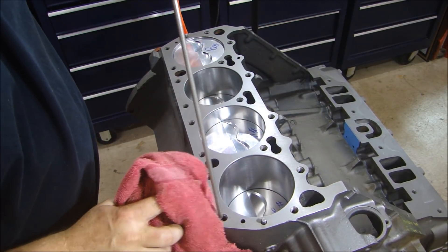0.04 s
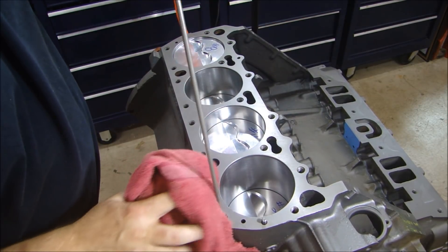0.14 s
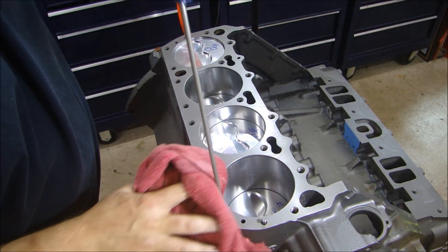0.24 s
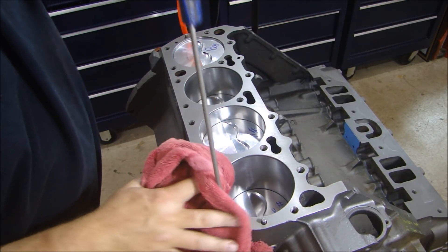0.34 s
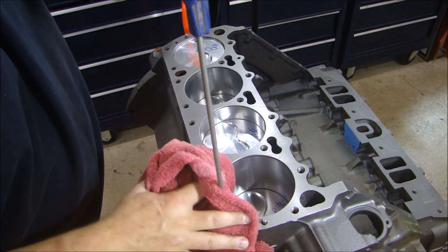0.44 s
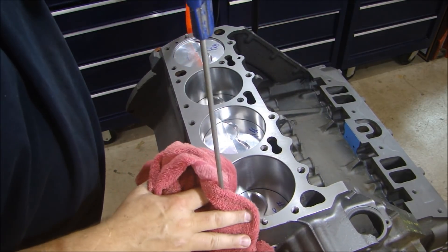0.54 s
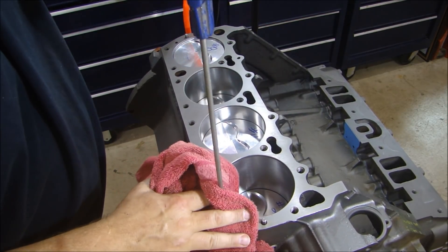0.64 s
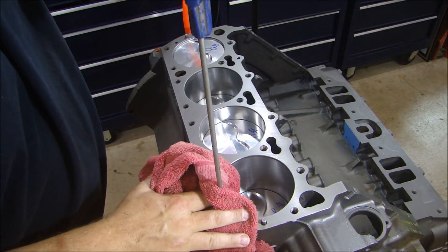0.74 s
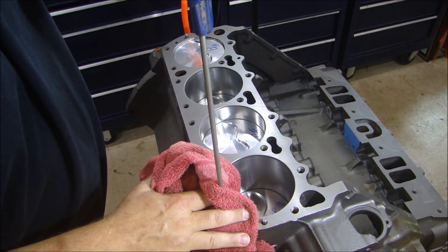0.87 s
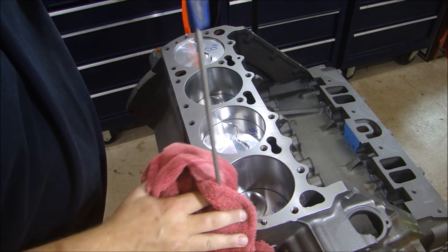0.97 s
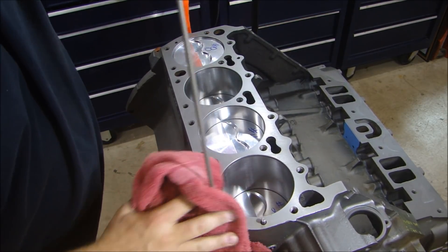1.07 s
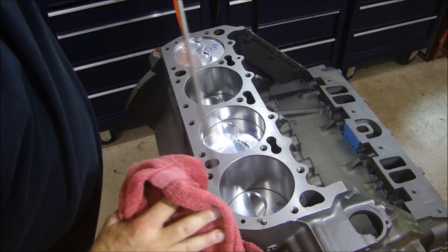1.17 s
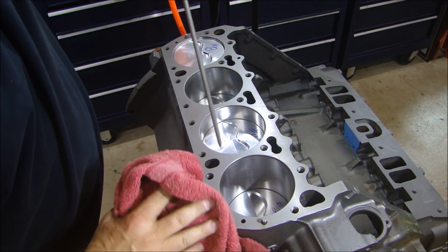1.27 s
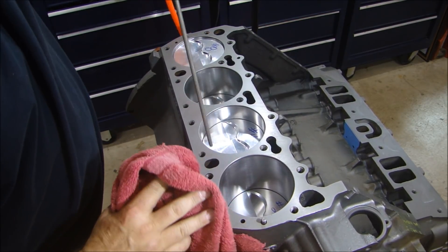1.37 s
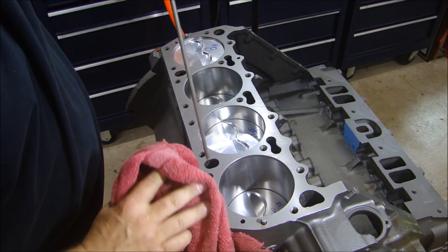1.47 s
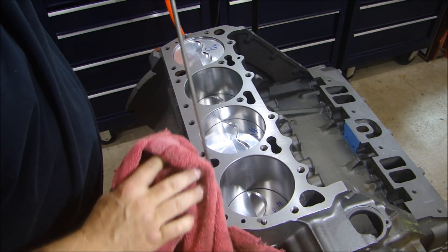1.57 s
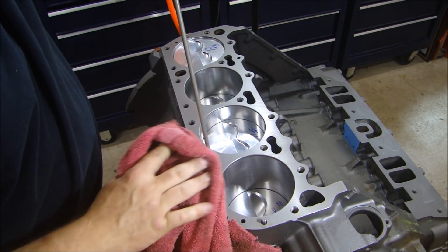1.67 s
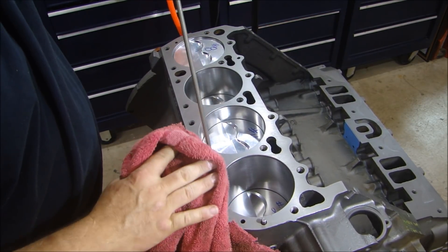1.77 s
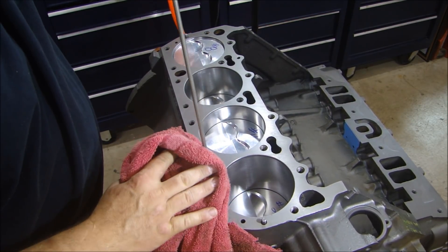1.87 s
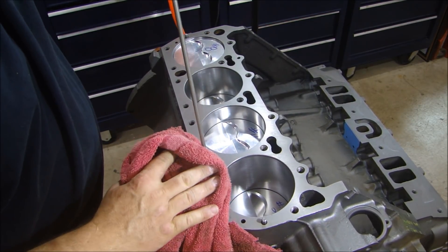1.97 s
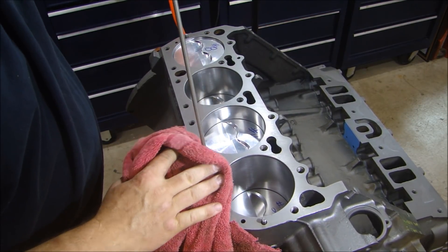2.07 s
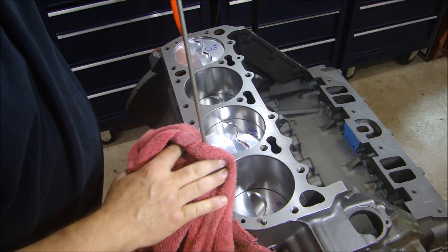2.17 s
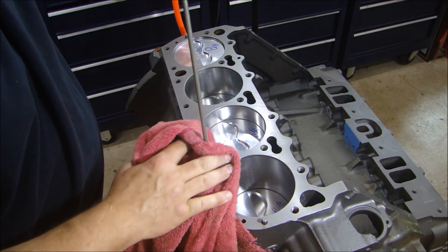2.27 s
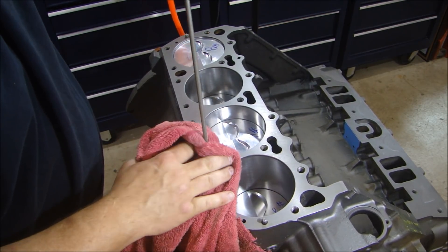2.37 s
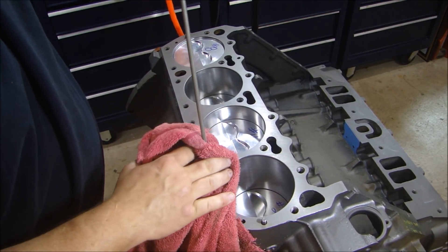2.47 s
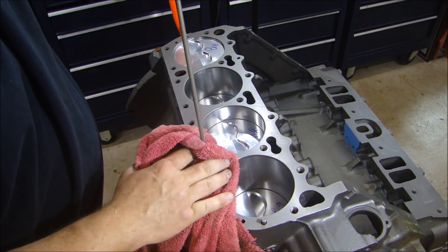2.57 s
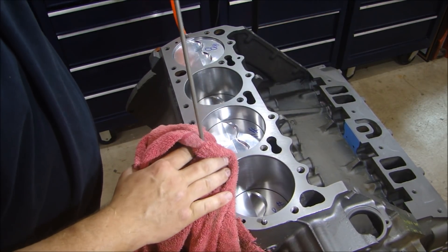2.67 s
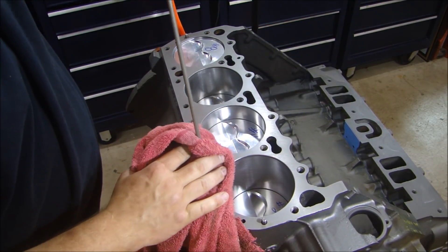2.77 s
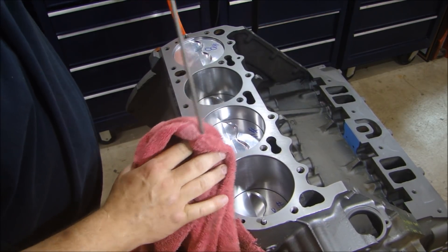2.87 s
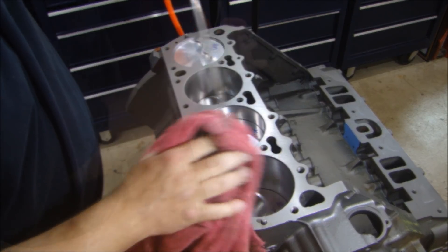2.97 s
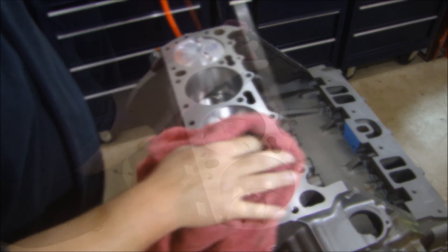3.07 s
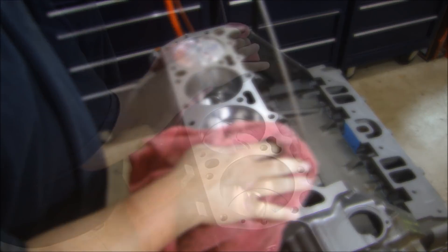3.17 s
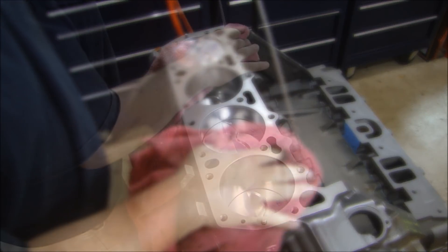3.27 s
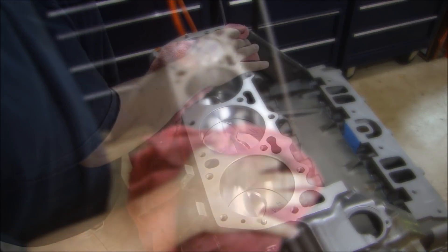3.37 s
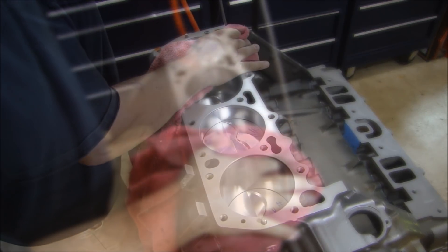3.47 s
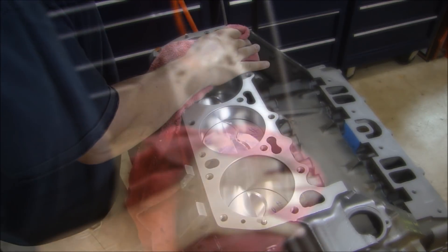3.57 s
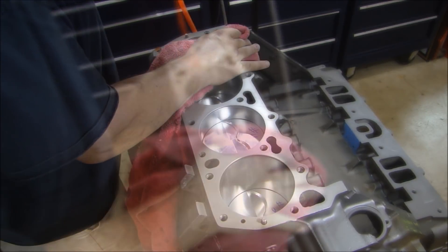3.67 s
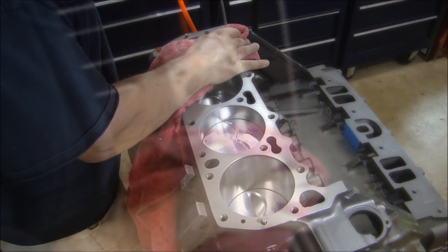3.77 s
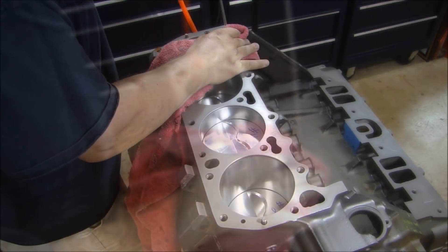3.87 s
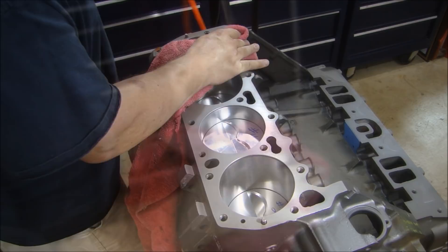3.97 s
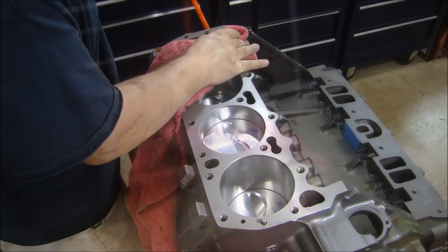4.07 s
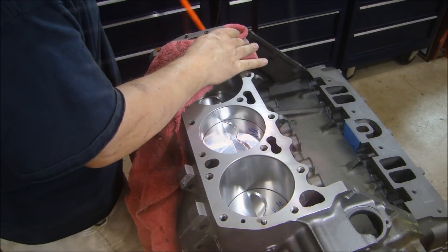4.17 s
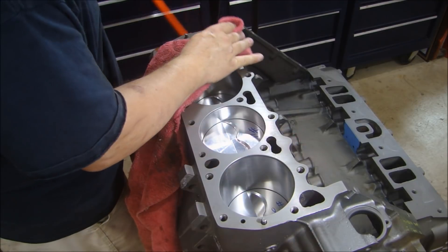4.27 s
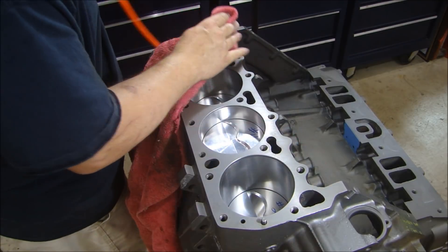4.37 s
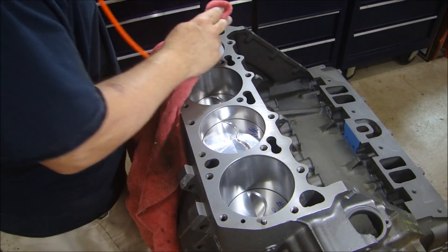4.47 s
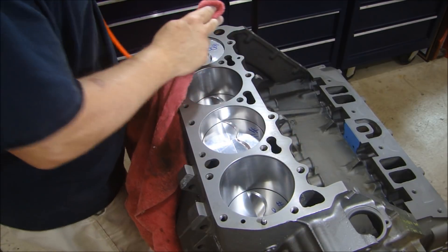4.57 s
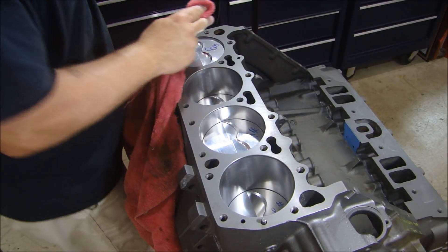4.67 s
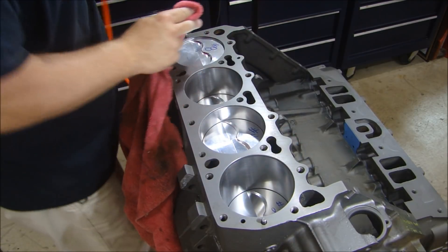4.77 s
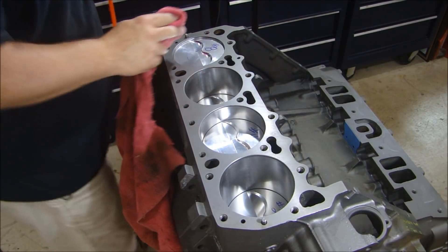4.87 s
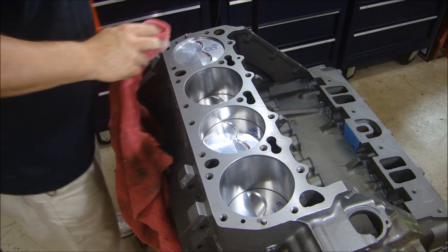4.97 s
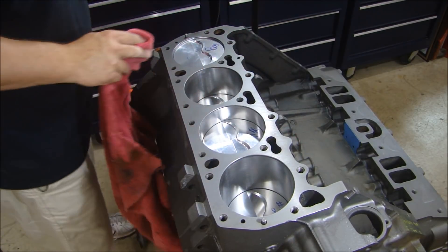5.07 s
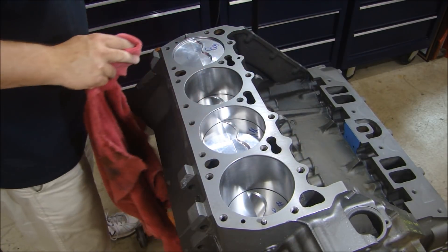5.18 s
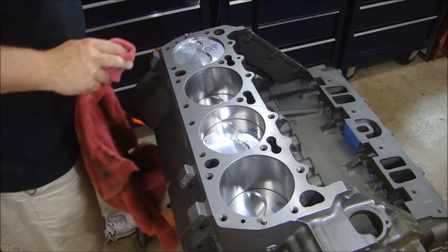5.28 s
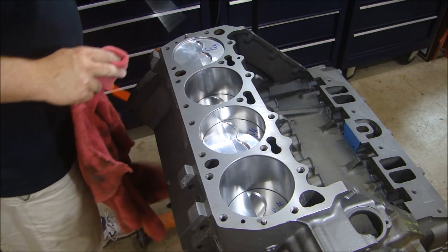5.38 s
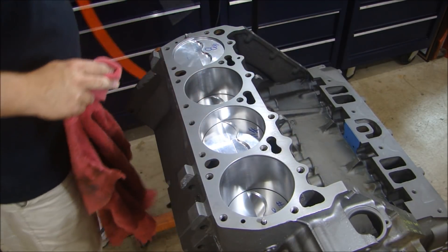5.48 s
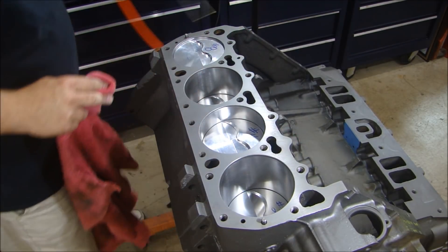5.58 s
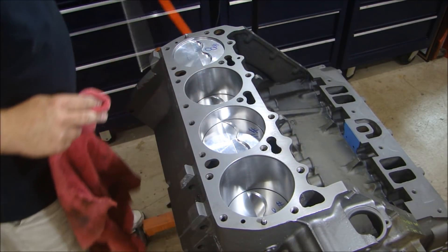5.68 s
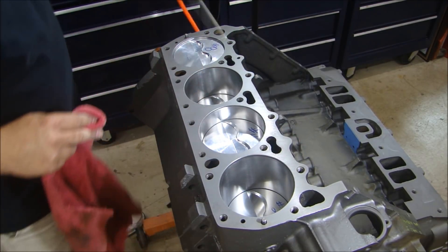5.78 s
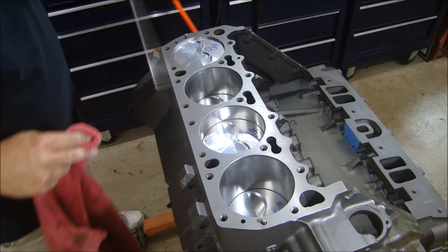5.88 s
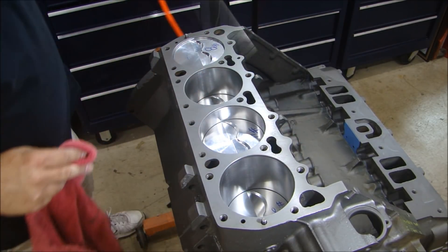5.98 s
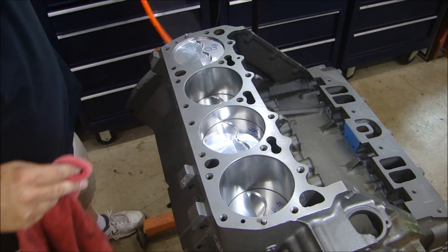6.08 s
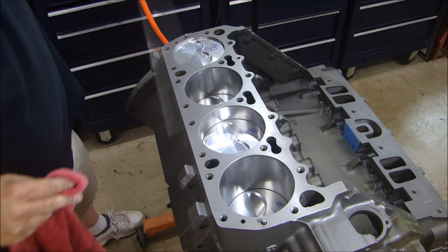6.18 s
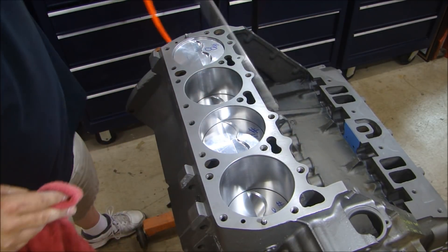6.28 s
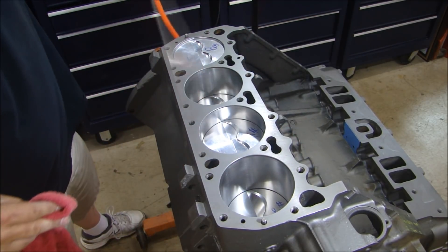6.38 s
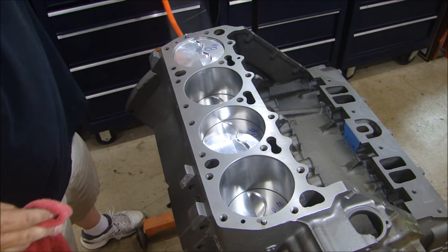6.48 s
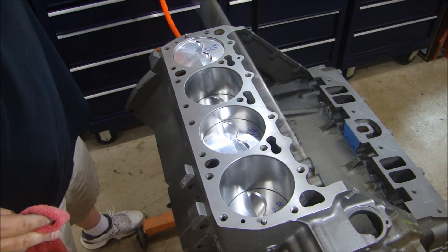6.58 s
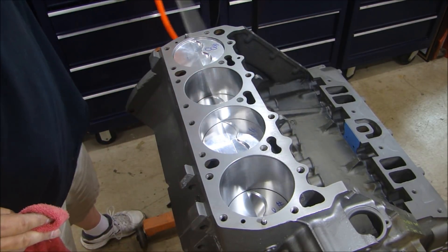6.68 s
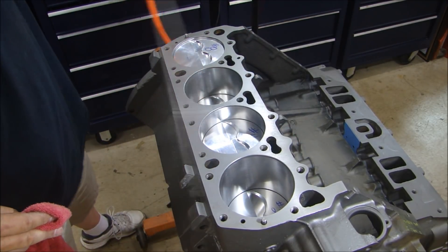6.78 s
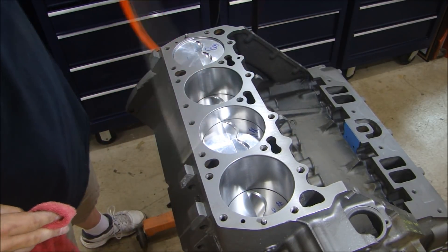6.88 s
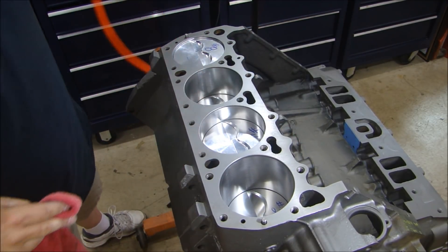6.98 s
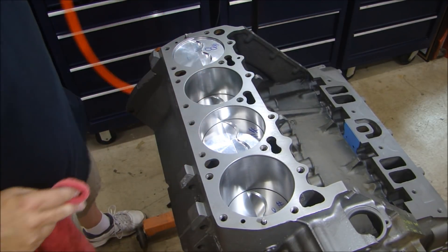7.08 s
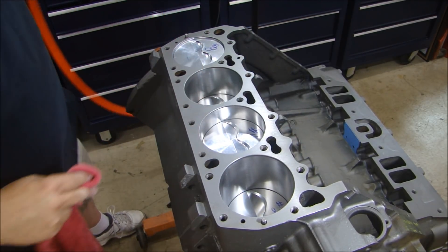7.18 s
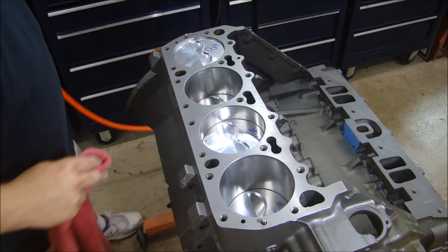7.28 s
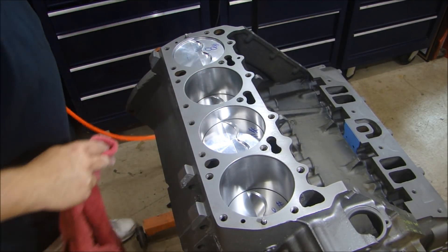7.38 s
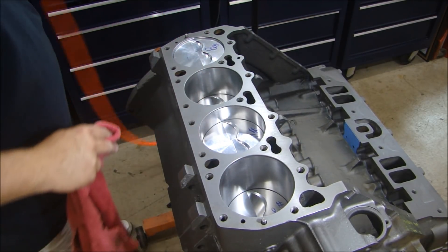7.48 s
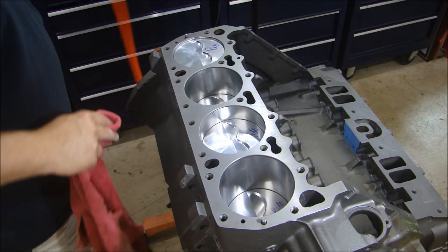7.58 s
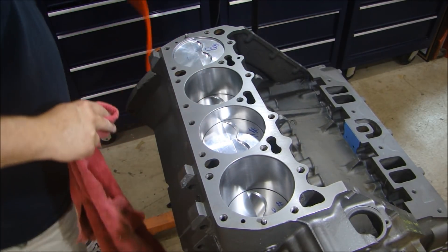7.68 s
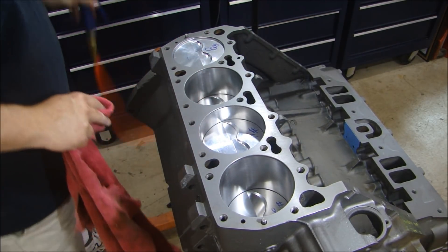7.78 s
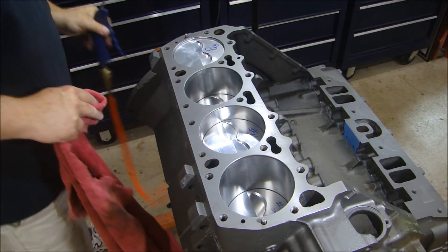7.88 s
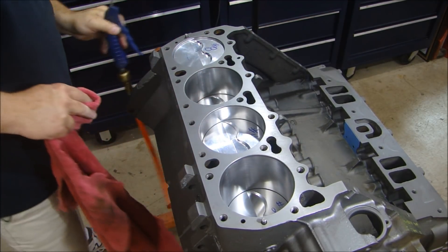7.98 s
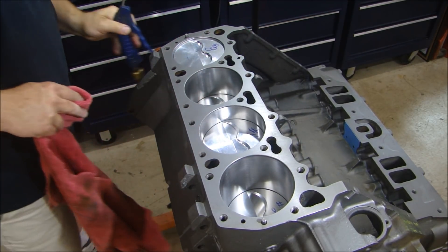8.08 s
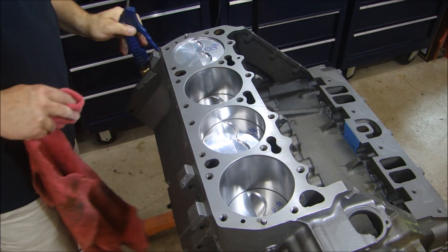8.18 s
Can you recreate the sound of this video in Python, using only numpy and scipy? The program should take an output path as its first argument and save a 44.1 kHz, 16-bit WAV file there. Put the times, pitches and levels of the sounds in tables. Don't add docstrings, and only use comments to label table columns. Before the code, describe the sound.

Three roaring compressed-air blasts muffled by a rag, a hard steel clank, then an open jet fluttering and whistling over metal holes, ending in a roomy bang.

```python
import sys
import numpy as np
from scipy import signal
from scipy.io import wavfile
from scipy.ndimage import uniform_filter1d

SR = 44100
rng = np.random.default_rng(int(sys.argv[2]) if len(sys.argv) > 2 else 0)


def to_linear_factor(level_db):
    exponent = np.asarray(level_db, float) / 20
    return 10 ** exponent


def store_pcm(level_fs):
    pcm = np.round(np.clip(level_fs, -1, 1) * 32767).astype(np.int16)
    wavfile.write(sys.argv[1], SR, np.atleast_2d(pcm).T)


N = 363384
CUT_S = 4.463
HZ = np.fft.rfftfreq(256, 1 / SR)
FRAME_S = np.arange(N // 64 + 5) * 64 / SR

# hz, density [dB per Hz]
RAG_JET = [(180, -63), (300, -15), (562, -14), (1140, -7.5), (2130, -12), (3990, -13), (8100, -16),
           (10500, -15), (12700, -21), (13300, -67), (14000, -95)]


def evened(x):
    return x / np.sqrt(np.mean(x ** 2) + 1e-20)


def read(points, hz):
    f, value = np.transpose(points)
    return np.interp(np.log(hz + 1), np.log(f + 1), value)


def add(mix, s, sound):
    part = mix[..., round(s * SR):][..., :sound.shape[-1]]
    part += sound[..., :part.shape[-1]]


def patchwork(shape, frames, bins):
    smeared = uniform_filter1d(rng.standard_normal(shape), size=frames, axis=0)
    return evened(uniform_filter1d(smeared, size=bins, axis=1))


def noise(magnitude, hz, size, same=1):
    # hz, likeness [0 to 1]
    likeness = [(60, 0.5), (180, 0.83), (520, 0.64), (1550, 0.5), (4580, 0.36), (13500, 0.25)]
    # hz, left over right [dB]
    lean = [(60, -8), (180, -4), (520, -1.5), (1550, -1.5), (4580, -0.6), (13500, 1.4)]
    # hz, left leads by [radians]
    lag = [(0, 0.01), (950, .3), (1500, 0.02), (2900, 0.55), (5000, 0.28), (7000, 0.091), (10000, 0.46),
           (13700, -.3)]
    a, b, c, d = rng.standard_normal(magnitude.shape + (4,)).T
    left, other = a + 1j * b, c + 1j * d
    alike = np.clip(same * read(likeness, hz), 0, 1)[:, None]
    z = np.array([left, alike * left + np.sqrt(1 - alike ** 2) * other])
    z = z * magnitude.T * to_linear_factor(np.multiply.outer([.5, -.5], read(lean, hz)))[..., None]
    z[0] *= np.exp(1j * read(lag, hz))[:, None]
    return .61 * signal.istft(z, nperseg=size, noverlap=size * 3 // 4)[1][:, :N]


def resonate(x, hz, width):
    turn = np.exp(2j * np.pi * np.cumsum(hz * np.ones(x.shape[-1])) / SR)
    r = np.exp(-np.pi * width / SR)
    return 2 * (turn * signal.lfilter([1 - r], [1, -r], x / turn)).real


def fuzzy(x, hz, width):
    return resonate(resonate(x, hz, width), hz, width)


def coloured(x, points):
    level_db = np.maximum(read(points, abs(np.fft.fftfreq(2048, 1 / SR))), -100)
    taps = np.fft.ifft(np.exp(np.conj(signal.hilbert(np.log(to_linear_factor(level_db)))))).real[:1024]
    return signal.oaconvolve(x, taps)[:len(x)]


def low_cut(x, order, hz):
    return signal.sosfilt(signal.butter(order, hz, "high", fs=SR, output="sos"), x)


def garage(x):
    # hz, t60_s
    decay = [(250, 1), (700, 0.99), (1700, 0.95), (4500, 0.8), (9000, 0.66), (13000, 0.56)]
    hz, t, z = signal.stft(rng.standard_normal((2, SR)), SR, nperseg=256)
    tail = signal.istft(z * to_linear_factor(-60 * t / read(decay, hz)[:, None]), SR, nperseg=256)[1]
    tail = tail * np.clip(np.arange(tail.shape[1]) / SR / 0.0009, 0, 1)
    tail = (tail + .45 * tail[::-1]) * to_linear_factor([[-.9], [.9]])
    tail = tail / np.linalg.norm(tail[0])
    sounding, out = np.flatnonzero(x[0]), np.zeros_like(x)
    first, last = sounding[0], sounding[-1]
    add(out, first / SR, signal.fftconvolve(x[:, first:last + 1], tail, axes=1))
    return out


def room_tone(loud):
    # hz, density [dB per Hz]
    tone = [(29, -72), (50, -53.5), (273, -4), (380, -6.5), (427, -6), (623, -9.5), (998, -8.5),
            (1290, -10.5), (1530, -10.5), (2950, -19.5), (11300, -36.5), (12400, -51), (14000, -63)]
    # time_s, gain_db
    drift = [(0, 5.5), (2.1, 5), (2.85, 0), (3.03, 4.5), (3.075, 8.5), (3.5, 9.5), (4.45, 7), (4.6, 9),
             (4.63, -6), (4.8, 6.5), (5.25, 4), (6.8, -34), (7.15, -8), (7.45, 5), (8.24, 9.5)]
    tone_db, duck_db, bass_db = -38.5, 9, -4
    loud_db, loud_span_db, reopen_s = -28, 15.5, 0.26
    level_db = 10 * np.log10(abs(uniform_filter1d((loud ** 2).mean(0), size=800)) + 1e-12)
    keep = np.exp(-1 / SR / reopen_s)
    shut = np.clip((level_db - loud_db) / loud_span_db, 0, 1)
    shut = np.maximum(shut, signal.lfilter([1 - keep], [1, -keep], shut))
    gain_db = np.interp(np.arange(N) / SR, *np.transpose(drift)) - duck_db * shut

    hz = np.fft.rfftfreq(1024, 1 / SR)
    field_db = read(tone, hz) + 1.54 * patchwork((N // 256 + 5, len(hz)), 12, 10)
    cut_db = bass_db / (1 + (hz / 260) ** 4)
    shape = to_linear_factor(field_db + cut_db) / np.linalg.norm(to_linear_factor(field_db), axis=1).mean()
    return to_linear_factor(tone_db + gain_db) * noise(shape / 2, hz, size=1024, same=0.7)


def thumps():
    # start_s, level_db
    bumps = [
        (3.891, -61),
        (4.46, -49),
        (4.609, -48),
        (5.91, -45),
        (7.599, -54),
    ]
    out, u = np.zeros((2, N)), np.arange(3000) / SR / 0.0044
    for s, db in bumps:
        add(out, s, to_linear_factor(db) * u * np.exp(1 - u) * np.cos(1.4 * u) * np.array([[.1], [1.2]]))
    return out


def knocks(rows, modes, crack, modes_db, squash_db, recover_s):
    dry, send, t = np.zeros((2, N)), np.zeros((2, N)), np.arange(SR // 2) / SR
    ring = 0
    for hz, db, t60 in modes:
        decay = to_linear_factor(db - 9.5 - 60 * t / min(t60, .8))
        for off in np.linspace(-1, 1, 3) + rng.uniform(-.4, .4, size=3):
            ring = ring + decay * np.sin(2 * np.pi * hz * (1 + .011 * off) * t)
    blow = coloured(1. * (t == 0), crack)
    blow = to_linear_factor(12.5) * blow / np.linalg.norm(blow)
    for s, peak_db, room_db in rows:
        burst = coloured(rng.standard_normal(len(t)) * to_linear_factor(-60 * t / .014), crack)
        bare_click = rng.standard_normal(len(t)) * to_linear_factor(-60 * t / 0.0023)
        burst = burst / abs(burst).max() + 0.42 * bare_click
        add(dry, s + .0015, to_linear_factor(peak_db) * (burst / abs(burst).max() + to_linear_factor(modes_db - 3) * ring))
        add(send, s, to_linear_factor(peak_db + room_db) * (blow + to_linear_factor(modes_db + 5) * ring * to_linear_factor(-60 * t / 0.3)))
    after = np.maximum(np.arange(N) / SR - rows[0][0], 0)
    return low_cut(dry + garage(send) * to_linear_factor(-squash_db * np.exp(-after / recover_s)), 3, 90)


def clank():
    # start_s, peak_db, room_share_db
    blows = [
        (4.611, -3.5, 1.3),
        (4.694, -42, 1.7),
    ]
    # pitch_hz, level_db, t60_s
    steel = [(1640, -7.5, 0.36), (2170, -8, .45), (2580, -5.5, .6), (3332, -19.5, .4), (3700, 1, 0.48),
             (3900, -18.5, .6), (4230, -10, .6), (4900, -8, 0.58), (5050, -8.5, 0.58), (5350, -7.5, 0.54),
             (6030, -15.5, .55), (6060, -19, .5), (7350, -7, 0.58), (8160, -27, 0.45)]
    # hz, density [dB per Hz]
    crack = [(120, -48), (200, -35), (658, -45), (1150, -39), (1630, -6), (3140, -5), (3690, 0.5),
             (11500, -12.5), (14000, -30)]
    return knocks(blows, steel, crack, modes_db=-20.5, squash_db=0.87, recover_s=0.037)


def bang():
    # start_s, peak_db, room_share_db
    blows = [
        (7.602, -5.5, 10.5),
        (7.697, -9, -3),
    ]
    # pitch_hz, level_db, t60_s
    bench = [(518, -0.5, 0.44), (783, -5, 0.99), (1680, -24, 1.3), (2270, -8, 1.1), (3500, -16, 0.87),
             (5400, -20, 0.23)]
    # hz, density [dB per Hz]
    crack = [(59, -62), (100, -22), (604, -10), (774, -10.5), (895, -10.5), (4130, -11), (10900, -21.5),
             (12400, -26), (14000, -101)]
    return knocks(blows, bench, crack, modes_db=-32.5, squash_db=3.9, recover_s=0.15)


def ticks():
    # start_s, peak_db, low_ring_hz, high_ring_db, t60_s
    touches = [(0.0044, -26.5, 1590, -31, 0.019), (0.1446, -18.5, 4030, -8, 0.014),
               (0.263, -20.5, 1820, 0, 0.024), (0.272, -25, 2930, -25, 0.026),
               (0.306, -30, 2750, -25, 0.011), (0.319, -23, 4060, -20, .012), (.347, -26, 2050, -21, 0.014),
               (0.406, -17, 2320, -27, 0.019), (1.923, -28.5, 3220, -32, 0.032),
               (1.932, -30, 2070, -34, 0.031), (2.017, -29, 3200, -16, 0.026),
               (2.0218, -21.5, 5000, -13, 0.016), (2.028, -24, 3300, -23, 0.018),
               (2.034, -34, 1700, -25, .012), (3.062, -28.5, 1500, -26, 0.04), (3.148, -36, 8500, 0, .015),
               (3.279, -21.5, 4470, -24, 0.026), (3.888, -15, 700, -35, 0.024),
               (.2097, -33, 4280, -20, .012), (.2361, -33, 4300, -12, .012), (.327, -25, 4200, -20, .01),
               (4.693, -13, 4000, -17, 0.0055), (5.0184, -37, 1940, -27, 0.026),
               (7.905, -28, 2720, -15, .024), (7.9326, -17, 2230, 2, 0.16),
               (7.9957, -13.5, 2880, -35, 0.011), (8.174, -27, 1500, -35, 0.046)]
    out, t = np.zeros((2, N)), np.arange(4000) / SR
    for s, peak_db, low_hz, high_db, t60 in touches:
        click = rng.standard_normal(len(t)) * to_linear_factor(-60 * t / (0.68 * t60))
        ring = evened(resonate(click, low_hz, 950))
        ring = ring + to_linear_factor(high_db - 2.0) * evened(resonate(click, 6530, 1100))
        ring = ring + 0.24 * evened(resonate(click, 2500, 2900)) + 0.18 * evened(resonate(click, 1300, 900))
        add(out, s + 0.001126, to_linear_factor(peak_db) * ring / abs(ring).max())
    out = signal.sosfilt(signal.butter(2, [600, 11500], "band", fs=SR, output="sos"), out)
    return out + to_linear_factor(-8.5) * garage(out)


def fitting_rings():
    # start_s, pitch_hz, width_hz, level_db, t60_s
    ring_rows = [(7.934, 6980, 60, -41, .35), (7.23, 7550, 40, -67, 3), (7.27, 9500, 6000, -62, 9),
                 (7.655, 500, 90, -25, .3), (7.695, 740, 130, -24, .4), (7.78, 740, 110, -32, .4),
                 (7.61, 120, 60, -44, .7), (5.755, 330, 120, -33, .15), (3.886, 600, 300, -35, .06),
                 (3.061, 750, 400, -44, .07), (2.92, 3900, 2200, -45, 1.5), (6.595, 1200, 130, -30, .35),
                 (2.83, 6500, 5000, -42, 1.2), (6.79, 2200, 50, -47, 1.1), (3.97, 2300, 900, -27, 1.6)]
    out, t = np.zeros((2, N)), np.arange(SR // 3) / SR
    fade_out = np.minimum(1, 20 * (t[-1] - t))
    for s, hz, width, db, t60 in ring_rows:
        fuzz = evened(fuzzy(rng.standard_normal(SR * 2 // 5), hz, width)[-len(t):])
        rise = 1 - np.exp(-t / 0.0078 / t60)
        add(out, s, to_linear_factor(db - 60 * t / t60) * fuzz * rise * fade_out * to_linear_factor([[-.8], [.8]]))
    return out


def glides():
    # start_s, length_s, start_hz, end_hz, level_db
    tones = [(0.226, 0.03, 4250, 4400, -44), (.215, 0.038, 8400, 8100, -56), (.302, 0.032, 2940, 2800, -43),
             (.343, 0.016, 2050, 1900, -40), (2.58, 0.18, 6200, 10000, -43), (2.13, .07, 2020, 2060, -24.5),
             (2.5, .3, 4100, 4000, -32), (7.998, .08, 3000, 3000, -48), (2.62, 0.21, 3850, 4600, -44),
             (2.63, 0.1, 2600, 2160, -29), (.428, 0.056, 1800, 2100, -24.5), (.43, 0.044, 1460, 1560, -30),
             (2.17, 0.17, 4900, 5060, -30.5), (3.553, 0.056, 2750, 2980, -23.5),
             (3.57, .24, 3900, 3900, -33), (3.6, 0.28, 4900, 5050, -30.5), (3.72, .19, 4240, 4400, -37),
             (3.91, .07, 2800, 2750, -28), (3.975, 0.077, 2150, 2200, -24.5), (4.0, .07, 2300, 3050, -36),
             (4.08, 0.18, 3370, 3350, -28), (4.07, 0.18, 4600, 4300, -32), (4.04, 0.22, 2200, 2300, -34),
             (5.43, 0.067, 1400, 1650, -27.5), (5.455, 0.059, 2350, 2300, -27),
             (5.525, 0.045, 2700, 2550, -26.5), (5.53, 0.08, 1700, 1550, -27.5),
             (5.49, .12, 790, 820, -33.5), (5.632, 0.115, 2320, 2260, -26.5),
             (5.305, 0.064, 2300, 2260, -29), (5.5, .11, 2330, 2280, -30), (6.085, .07, 2280, 2280, -30),
             (5.812, 0.021, 2700, 2600, -32), (8.18, 0.047, 1760, 1830, -54),
             (5.86, 0.026, 2200, 2250, -40), (6.005, 0.043, 860, 853, -34.5),
             (6.16, 0.048, 2270, 2250, -28), (6.593, 0.035, 1200, 1250, -27.5),
             (6.735, 0.045, 1200, 1200, -33), (6.512, .02, 2950, 2950, -30), (6.595, .03, 3660, 3650, -29),
             (6.2, 0.024, 3700, 3700, -28), (6.764, .024, 2660, 2530, -30.5),
             (5.74, 0.045, 360, 309, -33.5)]
    out = np.zeros((2, N))
    for s, length, from_hz, to_hz, db in tones:
        u = np.arange(-1000, round(length * SR)) / SR / length
        hz = from_hz + (to_hz - from_hz) * np.clip(u, 0, 1)
        near, apart = rng.standard_normal((2, SR // 2))[:, :len(u)]
        tone = fuzzy(np.array([near + 0.37 * apart, near - 0.24 * apart]), hz, .06 * from_hz)
        add(out, s, to_linear_factor(db) * evened(tone[:, 1000:]) * np.sin(np.pi * u[1000:]) ** 0.33 * to_linear_factor([[-.9], [.9]]))
    no_tail_after_cut = abs(np.arange(N) / SR - CUT_S - .3) > .3
    return out + to_linear_factor(-12.5) * garage(out) * no_tail_after_cut


def band(spectrum, lo_hz, hi_hz):
    edges = (1 + (lo_hz / (HZ + 1)) ** 10) * (1 + (HZ / hi_hz) ** 10)
    shape = to_linear_factor(read(spectrum, HZ)) / np.sqrt(edges)
    return shape / np.linalg.norm(shape)


def back_pressure_db(t):
    # start_s, swell_db, fade_s
    surges = [
        (.425, 11.5, 0.02),
        (2.122, 10, 0.073),
        (2.635, 4, 0.61),
        (3.546, 10.5, 0.042),
        (3.9, 8, 0.098),
        (3.98, 3.5, 0.37),
        (5.265, 2, 0.16),
        (5.429, 6, 0.44),
        (6.59, -14, 0.073),
    ]
    total_db = 0
    for at, db, fade in surges:
        age = np.maximum(t - at, 0)
        total_db = total_db + db * (1 - np.exp(-age / 0.003)) * np.exp(-age / fade)
    return total_db


def valve_db(t, start_s, end_s):
    # time_s, step_db
    snaps = [
        (.429, -1),
        (2.123, 10),
        (3.543, 9.5),
        (5.264, 7),
    ]
    return -sum(db * np.clip((at - t) / .004, 0, 1) for at, db in snaps if start_s < at < end_s)


def grit(size):
    per_s, height = 140, .36
    spits = height * np.minimum(rng.exponential(size=size), 2) * (rng.random(size) < per_s / SR)
    return 1 + np.convolve(spits, np.hanning(40), "same")


def jet(rows, spectrum, modes, low_hz, hole_hz, hole_width, hole_db, roar_db, flutter_db, patchy_db,
        flicker_db, drift):
    s, flow_db, gap_db = np.transpose(rows)
    frame_s = FRAME_S[(FRAME_S > s[0]) & (FRAME_S < s[-1])]
    t = frame_s[:, None]
    flow_db, gap_db = np.interp(t, s, flow_db), np.interp(t, s, gap_db)
    press_db = back_pressure_db(t) - 0.49 * gap_db

    centre = hole_hz - 64 * press_db
    roar = band(spectrum, 1697, 4800) * (1 + to_linear_factor(hole_db) / (1 + ((HZ - centre) / hole_width) ** 2))
    roar = to_linear_factor(roar_db + press_db) * roar / np.linalg.norm(roar, axis=1, keepdims=True)
    hiss = to_linear_factor(-0.16 * press_db) * band(spectrum, 3360, 6500)
    fizz = to_linear_factor(gap_db) * band(spectrum, 7240, 18000)
    flutter = to_linear_factor(flutter_db + 0.85 * press_db) * band(spectrum, low_hz, 1285)
    power = roar ** 2 + hiss ** 2 + fizz ** 2 + flutter ** 2

    patches = patchwork(power.shape, 40, 4)
    flicker = evened(uniform_filter1d(rng.standard_normal((len(power), 1)), size=8, axis=0))
    level = to_linear_factor(flow_db + patchy_db * patches + flicker_db * flicker)
    air = noise(np.sqrt(power) * level, HZ, size=256, same=1.33)
    air = air * grit(air.shape[1])
    air = air * to_linear_factor(valve_db(frame_s[0] + np.arange(air.shape[1]) / SR, s[0], s[-1]))
    air = np.pad(air, ((0, 0), (0, SR // 20)))

    wander = uniform_filter1d(rng.standard_normal(air.shape[1]), size=4000)
    wander = evened(uniform_filter1d(wander, size=4000))
    air = air + sum(to_linear_factor(db) * resonate(air, hz * (1 + drift * wander), width) for hz, width, db in modes)
    out = np.zeros((2, N))
    add(out, frame_s[0], low_cut(air, 4, 180))
    return out


def scrape():
    # start_s, length_s, level_db
    strokes = [
        (0.209, 0.04, -45),
        (0.308, 0.053, -37),
        (.368, .036, -46),
    ]
    # pitch_hz, width_hz, level_db
    tube_modes = [(2700, 900, -3), (4400, 800, 3), (8540, 690, -1)]
    ends_db, fizz_db = -9, -6
    rows = []
    for s, length, db in strokes:
        for share, off_db in ((0, ends_db), (0.27, 0), (1, ends_db)):
            rows.append((s + share * length, db + off_db, fizz_db))
    return jet(rows, RAG_JET, tube_modes, low_hz=450, hole_hz=3400, hole_width=1500, hole_db=2.4,
               roar_db=-1, flutter_db=-10, patchy_db=2.5, flicker_db=2.4, drift=.02)


def rag_blasts():
    # time_s, air_flow_db, rag_gap_db (how much fizz escapes)
    blasts = [
        [(0.412, -38, -7), (0.438, -22, -5.5), (0.494, -18, -3.5), (0.574, -22.5, -4), (0.838, -21, -4),
         (1.016, -22.5, -3.5), (1.056, -66, -3), (1.1, -28.5, -6), (1.13, -46, 0)],
        [(2.118, -39, -8), (2.134, -22, 4), (2.252, -21.5, -1.5), (2.348, -20, 1.5), (2.408, -23, -3.5),
         (2.42, -24, -2), (2.788, -20.5, -2.5), (2.808, -24, -0.5), (2.826, -46, 5)],
        [(3.44, -37, -22), (3.47, -40, -9), (3.582, -19, 1.5), (3.686, -19.5, 0), (3.872, -18.5, 0),
         (3.924, -20.5, 1.5), (4.118, -21, -5.5), (4.46, -23, -6.5), (4.47, -33, -3)],
    ]
    # pitch_hz, width_hz, level_db
    blast_modes = [
        [(590, 184, 8.5), (2850, 110, -30), (11100, 200, -22)],
        [(255, 13, 19.5), (597, 187, 9), (1820, 280, 1.5), (3820, 160, -2.5), (5000, 89, -23.5),
         (7000, 250, 1.5)],
        [(2880, 130, -7.5), (3960, 99, -1), (4470, 40, 1), (4940, 55, -6)],
    ]
    holes = [(2880, 0.0, 0.12), (2860, 0.5, -0.1), (2930, -3.5, -0.79)]  # pitch_hz, roar_db, pan_db
    air = []
    for rows, modes, (hz, roar_db, pan_db) in zip(blasts, blast_modes, holes):
        blast = jet(rows, RAG_JET, modes, low_hz=450, hole_hz=hz, hole_width=630, hole_db=2.5,
                    roar_db=roar_db, flutter_db=-21.5, patchy_db=1.3, flicker_db=0.55, drift=.008)
        air.append(blast * to_linear_factor([[pan_db], [-pan_db]]))
    air[0] = scrape() + air[0]
    first, second, third = [x + to_linear_factor(room_db) * garage(x) for x, room_db in zip(air, (-7, -13, -7))]
    return first + second + third * np.clip((CUT_S - np.arange(N) / SR) / 0.00071, 0, 1)


def swung_db(t):
    # time_s, loss_db, half_length_s
    swings = [(5.705, 5.5, 0.047), (5.893, 19, 0.018), (5.938, 3.5, 0.0081), (5.984, 14, 0.017),
              (6.069, 14, 0.013), (6.222, 13.5, 0.056), (6.03, 4, 0.0058), (6.272, 3, 0.0053),
              (6.308, 0, 0.013), (6.366, -1.5, 0.013), (6.463, 10, 0.011), (6.542, -4, 0.016),
              (6.652, 2.5, 0.013)]
    return sum(db * np.exp(-((t - at) / half) ** 2) for at, db, half in swings)


def sweep():
    # time_s, air_flow_db, openness_db
    flow = [
        (5.25, -34, 5),
        (5.272, -26.5, 9),
        (5.42, -26, 6.5),
        (5.45, -27.5, 2.5),
        (5.76, -25, 5),
        (5.88, -26.5, 5.5),
        (6.4, -30.5, 3.5),
        (6.778, -30.5, 1.5),
        (6.81, -38, -6),
    ]
    # start_s, peak_db, whistle_hz, whistle_against_rush_db
    crossings = [(5.312, -9, 2270, -11.5), (5.4286, -10, 2380, -8), (5.461, -16, 2270, -8),
                 (5.527, -26, 2050, 1), (5.608, -21, 1940, 1), (5.6344, -15, 2400, 0),
                 (5.679, -10, 2170, -8), (5.7194, -20, 2280, -2), (5.778, -9, 2480, -12),
                 (5.921, -13.5, 2230, -32), (5.953, -11.5, 1660, -22), (6.008, -11.5, 2180, -34),
                 (6.046, -14.5, 2747, -6), (6.087, -12.5, 2210, -3.5), (6.126, -11, 2300, -25),
                 (6.136, -14, 2320, -7), (6.158, -10, 2270, -6), (6.1955, -4.5, 2270, -10),
                 (6.2532, -3.5, 2240, -5.5), (6.2834, -10, 2270, -4), (6.34, -11.5, 2324, -3),
                 (6.402, -12.5, 2270, -7.5), (6.4435, -16, 2170, -2.5), (6.4852, -13.5, 2160, -18),
                 (6.521, -24, 2160, -20), (6.5524, -20, 2180, -20), (6.593, -10.5, 3700, -9),
                 (6.615, -15, 3460, -12), (6.63, -12, 1226, -4.5), (6.645, -14, 2300, -20),
                 (6.671, -13.5, 2270, -25), (6.723, -16, 2250, -19), (6.757, -15, 2180, -25),
                 (6.769, -12.5, 2148, -6.5)]
    # hz, density [dB per Hz]
    open_jet = [(71, -64), (120, -56), (277, -27.5), (412, -17), (1310, -13), (2240, -1.5), (2580, -3.5),
                (4240, -8), (10600, -10), (12900, -12), (14000, -87)]
    # pitch_hz, width_hz, level_db
    deck_modes = [(274, 78, 1.5), (744, 210, -10.5), (1200, 37, -39), (1540, 160, 0.5), (2270, 47, -1)]
    cross_s = 0.021
    air = jet(flow, open_jet, deck_modes, low_hz=200, hole_hz=2140, hole_width=200, hole_db=-30, roar_db=0,
              flutter_db=-6.5, patchy_db=1.94, flicker_db=2.3, drift=0.0028)
    air, whistles = to_linear_factor(2.5) * air, np.zeros((2, N))
    rush = noise(np.tile(band(open_jet, 250, 18000), (SR // 64, 1)), HZ, size=256, same=0.9)
    rush = low_cut(rush, 4, 250)
    u = np.arange(round(3 * cross_s * SR)) / SR / cross_s
    for k, (s, peak_db, hz, whistle_db) in enumerate(crossings):
        swell = to_linear_factor(peak_db - 3.5) * (3 * u * np.exp(1 - 3 * u)) ** 1.5
        whistle = evened(fuzzy(rng.standard_normal(6000), hz, 100)[2000:][:len(u)])
        whistle = evened(whistle + 1.1 * np.sin(2 * np.pi * hz * u * cross_s))
        add(air, s - .004, rush[:, k * SR // 40:][:, :len(u)] * swell)
        fade = (swell * 1.72 * np.exp(-1.6 * u))[:len(whistle)]
        add(whistles, s - .004, to_linear_factor(whistle_db) * whistle * fade * to_linear_factor([[-.7], [.7]]))
    air, whistles = np.array([air, whistles]) * to_linear_factor(-swung_db(np.arange(N) / SR))
    return air + whistles + garage(to_linear_factor(-6.0) * air + to_linear_factor(-14) * whistles)


def wind_filter(x):
    # start_s, end_s, bass_cut_db
    closings = [
        (0.557, 1.09, 16),
        (2.2, 3.03, 11),
        (3.96, 4.397, 8),
        (4.62, 4.902, 15),
        (6.667, 7.198, 28),
    ]
    t, cut_db = np.arange(N) / SR, 0
    for start, end, db in closings:
        cut_db = cut_db + db * np.clip(np.minimum(t - start, end - t) / 0.014, 0, 1)
    bass = signal.sosfiltfilt(signal.butter(3, 265, fs=SR, output="sos"), x)
    return x - (1 - to_linear_factor(-cut_db)) * bass


def scene():
    loud = rag_blasts() + sweep() + glides() + clank() + bang()
    return wind_filter(loud + ticks() + fitting_rings() + room_tone(loud)) + thumps()


def low_pass(x):
    return signal.sosfilt(signal.butter(12, 14140, fs=SR, output="sos"), x)


def record(dry):
    heard = signal.sosfilt(signal.butter(12, 13100, fs=SR, output="sos"), dry)
    return low_pass(heard)


dry = scene()
out = record(dry)
store_pcm(out)
```